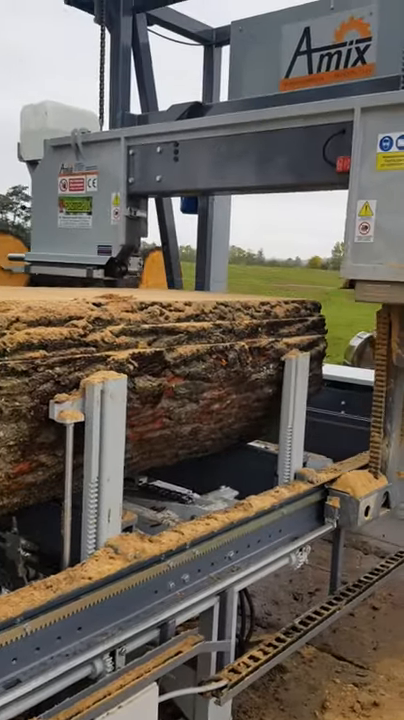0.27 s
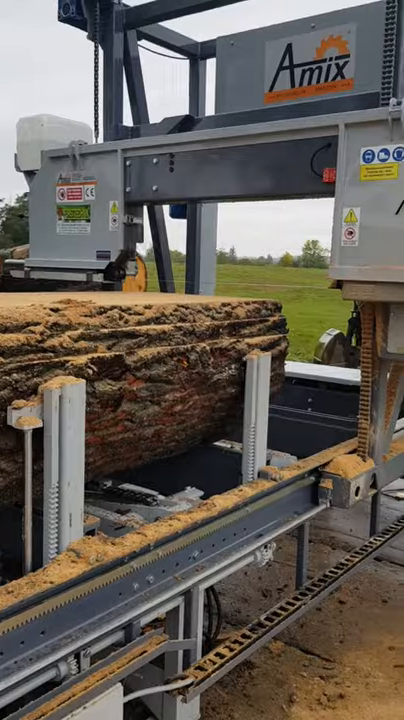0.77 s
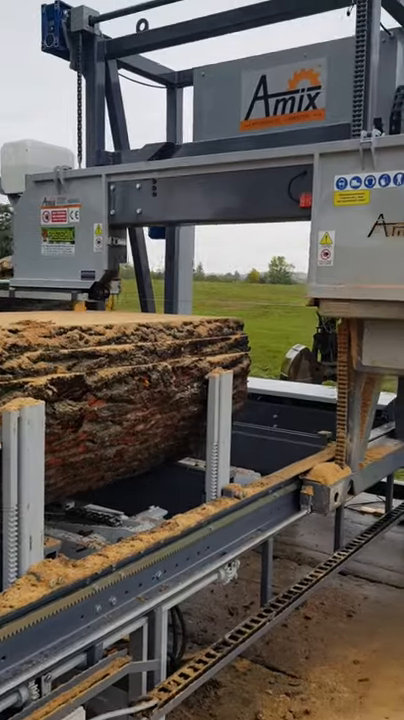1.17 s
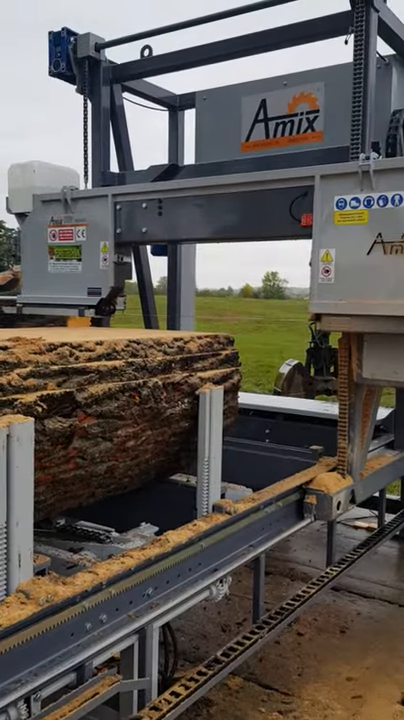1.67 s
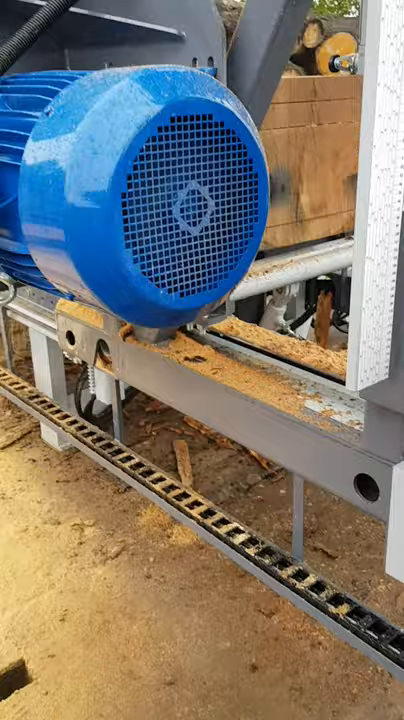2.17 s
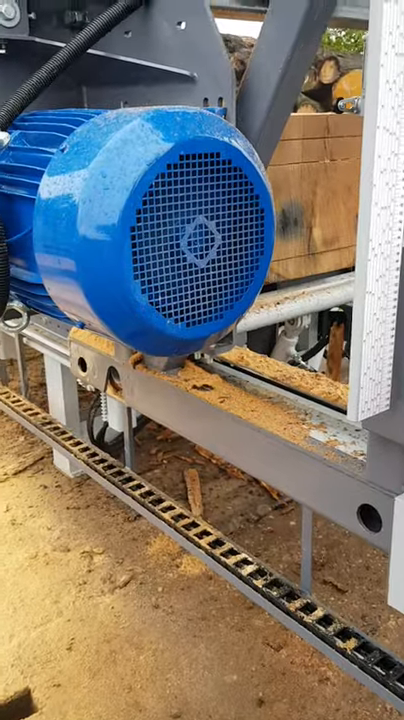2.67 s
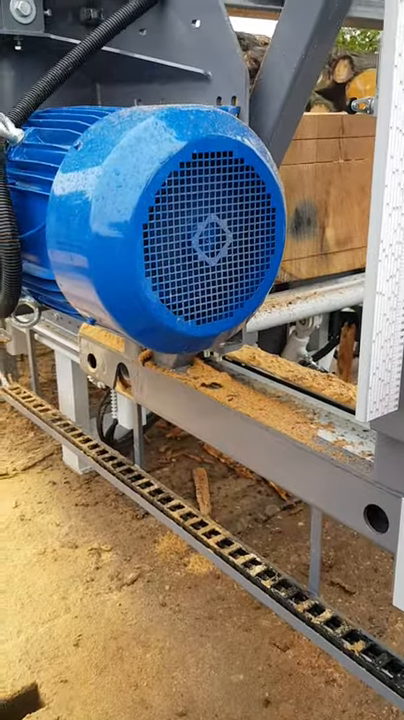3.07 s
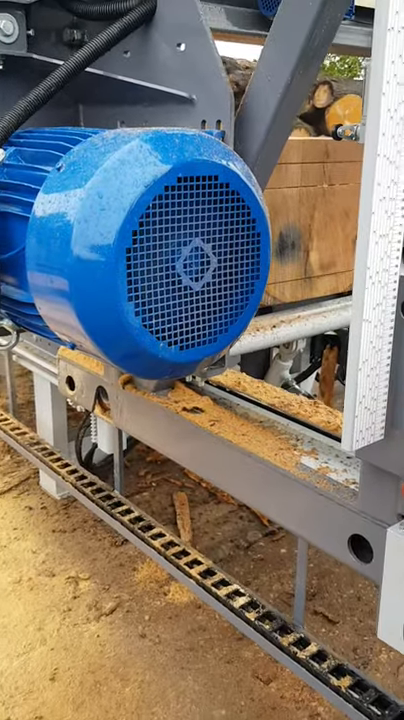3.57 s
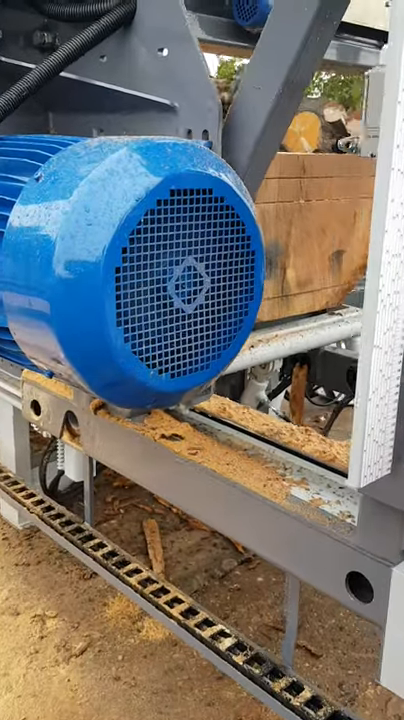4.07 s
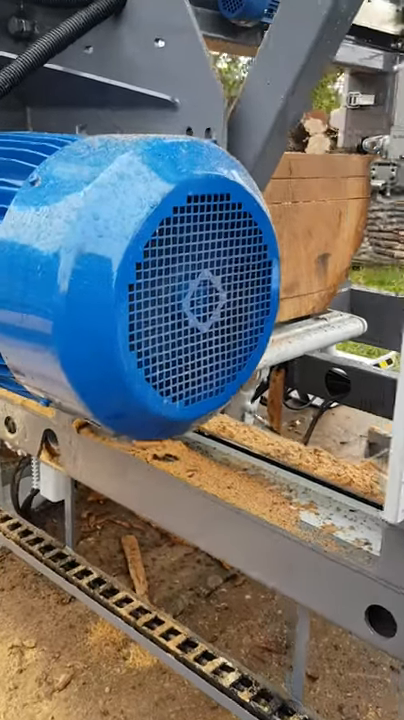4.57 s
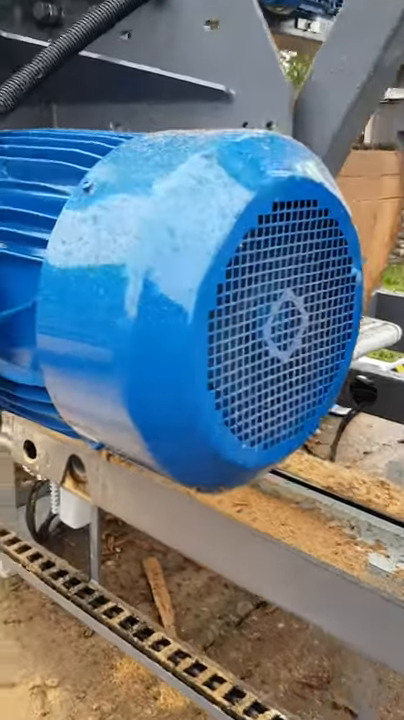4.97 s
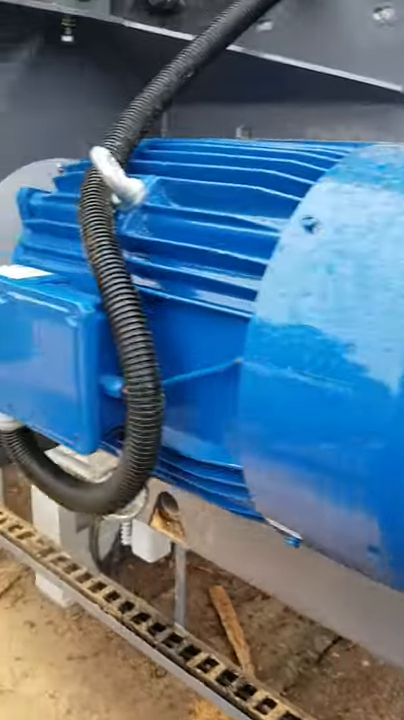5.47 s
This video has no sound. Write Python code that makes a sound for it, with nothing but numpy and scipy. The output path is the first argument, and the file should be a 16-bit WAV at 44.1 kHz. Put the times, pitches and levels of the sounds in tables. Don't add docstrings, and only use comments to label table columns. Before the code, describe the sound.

Outdoors in an open yard, a sawmill carriage rolls with loose steel rattling, hollow clanks, ticks and low wind buffeting on the microphone. The rattle thins and a faint high drive whine appears. At about 2.15 seconds a hard cut brings a much louder, close band saw in a log: steady toothy buzz, dense bright sawdust hiss, rough motor drone and wood crackle, continuing to the end.

```python
import sys
import numpy as np
from scipy import signal
from scipy.fft import rfft, irfft
from scipy.io import wavfile
from scipy.ndimage import uniform_filter1d

SR = 44100
rng = np.random.default_rng(int(sys.argv[2]) if len(sys.argv) > 2 else 0)


def invert_db(level):
    return 10 ** (np.asarray(level, dtype=float) / 20)


def to_wav(s):
    ch = np.atleast_2d(s).T
    pcm = np.round(np.clip(ch, -1, 1) * 32767)
    wavfile.write(sys.argv[1], SR, pcm.astype(np.int16))


N = 252252
T = np.arange(N) / SR
HZ = np.arange(N // 2 + 1) * SR / N + 1e-3
LR = np.array([[0.5], [-0.5]])
IDLE_END_S, SAW_START_S = 2.1485, 2.155
PORT_LAG = 6

# time_s, tooth_rate_hz
BLADE = [(2.29, 417.65), (2.66, 417.05), (3.04, 417.1), (3.41, 417.15), (3.78, 417.3), (4.15, 418.05),
         (4.52, 417.3), (4.89, 417.8), (5.27, 417.9)]
# pitch_hz, width_hz, level_db
PORT = [(48.8, 20, 0)]


def unit(x):
    return x / np.sqrt(np.mean(x ** 2))


def curves(table):
    s, *columns = np.transpose(table)
    return [np.interp(T, s, column) for column in columns]


def over_hz(table, outside=None):
    hz, value = np.transpose(table)
    return np.interp(np.log(HZ), np.log(hz), value, outside, outside)


def colour(table):
    return invert_db(over_hz(table, -99))


def rings(table):
    power = sum(invert_db(2 * db) / (1 + (2 * (HZ - hz) / width) ** 2) ** 2 for hz, width, db in table)
    return np.sqrt(power)


def window(start_s, length_s, edge_s):
    inside = np.minimum(T - start_s, start_s + length_s - T)
    return np.clip(inside / edge_s + 0.5, 0, 1) ** 2


def walk(rate, size=1):
    k = int(SR / rate)
    held = np.repeat(rng.standard_normal((size, N // k + 1)), k, axis=1)
    return 1.348 * uniform_filter1d(uniform_filter1d(held, k), k)[:, :N]


def noise(gain, like=None, grain_db=0.0, flicker_db=0.0, rate=12, even_s=3.6):
    # pitch_hz, likeness (0-1)
    likeness = [(60, 1), (150, 1), (300, 0.92), (500, 0.9), (700, 0.43), (1400, 0.19), (3000, 0.3),
                (16000, 0)]
    like = over_hz(likeness) if like is None else like
    grain = np.minimum(rng.exponential(size=N), 2 * np.pi)
    white = rng.standard_normal((2, N)) * invert_db(grain_db * grain + flicker_db * walk(rate, size=2))
    mid, side = rfft(white) * gain
    out = irfft(np.sqrt(1 + like) * mid + 2 * LR * np.sqrt(1 - like) * side, N)
    k = max(int(even_s * SR), 64)
    power = uniform_filter1d(uniform_filter1d(np.mean(out ** 2, axis=0), k), k)
    return unit(out / np.sqrt(power))


def tone(hz, wobble_hz, rate):
    return np.sqrt(2) * np.sin(2 * np.pi * np.cumsum(hz + wobble_hz * walk(rate)[0]) / SR)


def knocks(blows, crack_db, contact_cycles=0.25):
    out, t = np.zeros((2, N)), T[:4096]
    band = signal.butter(3, (1200, 4300), "band", fs=SR, output="sos")
    crack = signal.sosfilt(band, rng.standard_normal((len(blows), 4096)))
    for (s, db, hz, pan_db, cycles), grit in zip(blows, crack):
        ring = np.sin(2 * np.pi * hz * t) + 0.08 * np.sin(2 * np.pi * 1.58 * hz * t)
        ring = ring * np.exp(-t * hz / cycles)
        grit = 2 * invert_db(crack_db) * grit * np.exp(-t * hz / (0.94 * cycles + 3))
        rise = np.sin(np.pi / 2 * np.minimum(t * hz / contact_cycles, 1)) ** 2
        start = int(s * SR)
        out[:, start:start + 4096] += invert_db(db + LR * pan_db) * rise * (ring + grit)
    return out


def echoed(x):
    late = T - 0.001082 - 0.000141 * walk(1.2, size=2)
    return x + invert_db(-8) * np.array([np.interp(when, T, port) for when, port in zip(late, x)])


def lagged(x, samples):
    return np.array([x[0], np.roll(x[1], samples)])


def saw():
    # time_s, drone_db, left_minus_right_db, pure_tone_share_db
    motor = [(2.2, -27.5, -3, 7.5), (2.35, -27.5, 1, 5.5), (2.9, -24, -1, -4), (3.25, -28, -1.5, 7),
             (3.6, -22.5, 0, -6), (4.0, -28, 1.5, 10.5), (4.25, -22, 1.3, -4.5), (4.6, -21.5, 1, -3.5),
             (4.85, -30, 5, 8), (5.05, -25, 3.5, -3), (5.23, -29, 10, -6), (5.4, -24, 6.5, 0.5),
             (5.6, -23.5, 7, 6.5), (5.72, -17.5, 2, -4)]
    # time_s, hiss_db
    load = [(2.2, -20.5), (2.39, -23.5), (3.25, -23.5), (3.4, -25), (4.58, -23.5), (4.72, -25.5),
            (5.17, -24), (5.72, -26)]
    # time_s, log_db, guard_db
    ringing = [(2.2, 1, -0.5), (2.5, 2, 0.5), (2.9, 1.5, 1), (3.1, -2, 3), (3.3, 0, 3), (3.55, 0, -2.5),
               (3.85, 1.5, 2), (4.1, 0, 0), (4.4, 1.5, -7), (4.7, 0.5, 3.5), (4.9, 0, -9), (5.1, 3.5, 1.5),
               (5.3, 5, 4.5), (5.5, -1.5, 3), (5.72, 3, 2.5)]
    drone_db, pan_db, tone_db = curves(motor)
    near_db, load_db = drone_db + 25, curves(load)[0] + 23
    closing_db = 1.46 * (T - SAW_START_S)
    log_db, guard_db = curves(ringing)
    bite = teeth() * invert_db(-26 + load_db - 0.57 * closing_db - LR * 2.7)
    body = echoed(sawdust(load_db) + bite) + wood(log_db, load_db, closing_db)
    body = body + blade_guard(guard_db, closing_db) + frame_drone(near_db, pan_db)
    body = body + fan(near_db + tone_db, pan_db, closing_db)
    chatter_db = 0.6 * walk(22)
    return body * invert_db(chatter_db + uniform_filter1d(catches(), size=128)) + ground()


def teeth():
    # pitch_hz, level_db
    tooth = [(300, -11), (420, -6), (900, -26), (1250, -7), (1670, -10), (2090, -7), (2500, -14),
             (3600, -13.5), (4200, -12), (5000, -14.5), (5450, -12.5), (5850, -7), (6800, -5.5), (8300, -8),
             (9000, -12), (10400, -7.5), (11300, -15), (13000, -13), (13770, -10), (14400, -12),
             (15000, -12), (15700, -14)]
    turn, out = np.cumsum(curves(BLADE)[0]) / SR, np.zeros((2, N))
    for port in out:
        for drift in walk(3.5, size=5):
            place = turn + rng.random() + 0.036 * drift
            port += np.sin(75 * np.pi * place) / (np.sin(np.pi * place) + 1e-9)
    smear = np.exp(2j * np.pi * (HZ / 417.4) ** 2 / 74)
    return unit(irfft(rfft(out) * colour(tooth) * smear, N))


def whistles():
    # start_s, length_s, multiple of the tooth rate, level_db
    partials = [(2.16, 0.2, 36, -38), (2.16, 0.35, 19, -38), (2.2, 0.6, 4, -36), (2.3, 1.2, 25, -38.5),
                (2.95, 0.4, 4, -39), (3.9, 0.3, 4, -38), (2.3, 0.5, 20, -40), (2.8, 0.5, 32, -41),
                (2.5, 0.35, 33, -40), (2.6, 0.6, 17, -39), (2.9, 0.45, 20, -37), (3.1, 0.4, 31, -40),
                (3.15, 0.25, 15, -39), (3.55, 0.45, 25, -36), (3.75, 0.25, 18, -39), (3.95, 0.3, 17, -39),
                (4.2, 0.75, 16, -36), (4.3, 0.3, 33, -39), (4.35, 0.2, 27, -39), (4.4, 0.4, 25, -40),
                (4.55, 0.25, 18, -39), (4.75, 0.25, 15, -39), (5.1, 0.3, 18, -39), (5.55, 0.25, 15, -39)]
    turn = 2 * np.pi * np.cumsum(curves(BLADE)[0]) / SR
    flutter, lag = walk(14, size=2), walk(9, size=2)
    out = np.zeros((2, N))
    for s, length, k, db in partials:
        sine = np.sqrt(2) * np.sin(k * turn + np.roll(lag, int(97 * k), axis=1))
        level_db = db - 1 + 2.5 * np.roll(flutter, int(3001 * k), axis=1)
        out += sine * window(s, length, 0.13) * invert_db(level_db)
    return out


def sawdust(load_db):
    # pitch_hz, level_db (per Hz)
    hiss = [(2500, -60), (3200, -16), (3900, -6.5), (4200, -3.5), (5300, -4.5), (5900, 0), (6900, 2.5),
            (8000, 0), (8800, -3.5), (10400, 2), (11800, -0.5), (13300, 1), (14300, -1.5), (15300, -2.5),
            (16500, 2)]
    dust = noise(colour(hiss), grain_db=2.0, flicker_db=0.5, rate=14, even_s=0.051)
    dust = dust * invert_db(-23 + load_db - LR * 2.8)
    spray = signal.sosfiltfilt(signal.butter(2, 9000, "high", fs=SR, output="sos"), dust)
    return dust + (0.05 * (T - SAW_START_S) - 0.06) * spray


def wood(log_db, load_db, closing_db):
    # pitch_hz, width_hz, level_db
    log_notes = [(695.5, 95, 1.5), (587, 145, -3.5), (1353, 41, -1.5)]
    # pitch_hz, level_db (per Hz)
    fibres = [(250, -6), (430, -11), (699, -4.5), (874, -6.5), (1010, -10), (1170, -7), (1700, -5),
              (3170, -13), (4000, -21), (5200, -45), (8800, -120)]
    log = noise(rings(log_notes), flicker_db=2.0, rate=14, even_s=0.22)
    log = log * invert_db(-32.5 + log_db + 0.93 * closing_db + 0.37 * load_db + LR * 2.3)
    torn = noise(colour(fibres), grain_db=0.54, flicker_db=2.5, rate=23, even_s=0.14)
    return log + torn * invert_db(-27 + closing_db + 0.38 * load_db - LR * 3.7)


def blade_guard(guard_db, closing_db):
    # pitch_hz, width_hz, level_db
    guard_notes = [(1004, 47, 1), (990, 130, -5), (1074, 74, -1)]
    buzz = noise(rings(guard_notes), like=0.32, flicker_db=0.5, rate=12, even_s=0.48)
    buzz = buzz * invert_db(-30 + 0.22 * guard_db + 0.36 * closing_db - LR * 4.8)
    note_db = -40 + 2.4 * guard_db + 0.42 * closing_db + 1.9 * walk(18) - LR * 3
    return buzz + tone(983, 11.1, 25) * invert_db(note_db)


def frame_drone(near_db, pan_db):
    # pitch_hz, width_hz, level_db
    frame_notes = [(331.5, 73, 6), (306, 46, -1), (357, 24, 4), (248, 59, -22)]
    return noise(rings(frame_notes), even_s=0.026) * invert_db(-28 + near_db + LR * pan_db)


def fan(near_db, pan_db, closing_db):
    low = tone(167.4, 4.54, 14) * invert_db(-38 + 0.59 * closing_db + 1.3 * walk(9))
    hum = tone(326.1 + 1.702 * (T - SAW_START_S), 3.024, 20)
    return low + hum * invert_db(-31 + near_db + 1.4 * walk(18) + LR * pan_db)


def catches():
    # time_s, falter_db, surge_db
    knots = [(2.36, 0.5, 0), (2.621, 1, 3), (2.94, -1.5, 1.5), (3.577, -2, 1.5), (3.65, 2, 3.5),
             (3.711, 0, 0), (3.836, 1.5, 0), (4.151, -4, 2.5), (4.274, -5, 3), (4.332, 1, 0.5),
             (4.599, 1, 0.5), (4.653, -2, 2), (4.923, 0.5, 1.5), (5.091, -1, 2), (5.51, -2, 1.5),
             (5.565, -2, 2), (5.667, 2, 5), (5.698, -5, 0)]
    level_db = np.zeros(N)
    for s, falter_db, surge_db in knots:
        falter = falter_db * np.exp(np.minimum(T - s, 0) / 0.014)
        surge = surge_db * np.exp(np.minimum(s - T, 0) / 0.021)
        level_db += np.where(T < s, falter, surge)
    return level_db


def ground():
    # pitch_hz, level_db (per Hz)
    ground_colour = [(41, -47.5), (70, -12.5), (108, -8.5), (161, -5), (183, -3.5), (210, -7), (260, -2.5),
                     (340, -38), (570, -120)]
    return noise(colour(ground_colour), even_s=0.25) * invert_db(-36) + noise(rings(PORT), even_s=0.094) * invert_db(-39)


def carriage():
    # time_s, level_db
    roll = [(0.0, -2.5), (0.2, 0.6), (0.5, 0.5), (0.7, 6.5), (1.0, 2.5), (1.25, -3), (1.6, -3), (1.7, -12),
            (2.15, -15)]
    # pitch_hz, width_hz, level_db
    rail = [(690, 106, -4), (626, 250, 3.5), (800, 94, 0)]
    # pitch_hz, width_hz, level_db
    low_notes = [(314, 23, 10.5), (409, 87, 1.5), (247, 48, 3)]
    # pitch_hz, level_db (per Hz)
    loose = [(530, -32.5), (900, -1), (992, -9), (1150, 0), (1340, -7.5), (1810, -6), (2780, -12),
             (3820, -17.5), (4600, -33), (5550, -22), (7500, -39), (9750, -63), (16500, -120)]
    # time_s, rumble_surge_db, rattle_surge_db
    jolts = [(0.2, 8, 1), (0.405, 4, 7.5), (0.6, -7, 7.5), (0.83, 4, 0.5), (0.931, 11, 6.5),
             (1.01, 10.5, 3.5), (1.1, 10.5, -0.5), (1.13, 1, 6.5), (1.18, 9, 2.5), (1.36, 13, 4),
             (1.5, 10, 5), (1.26, 5, 5), (1.6, 8, 2), (1.725, 17, 11), (1.9, 1.5, 8), (2.0, 7, 6),
             (2.13, 9, 9)]
    db = curves(roll)[0]
    low_surge_db, high_surge_db = np.zeros((2, N))
    for s, low_db, high_db in jolts:
        jolt = np.exp(np.minimum((T - s) / 0.015, (s - T) / 0.046))
        low_surge_db += low_db * jolt
        high_surge_db += high_db * jolt
    ring = noise(rings(rail), like=0.6, grain_db=1.5, flicker_db=1.0, rate=46, even_s=0.17)
    ring = ring * invert_db(-43.5 - 6 * T + db + 1.27 * high_surge_db)
    rumble = noise(rings(low_notes), even_s=0.088) * invert_db(-50.5 + 3 * T + 1.3 * db + low_surge_db)
    rattle = noise(colour(loose), like=0.38, grain_db=2.5, flicker_db=3.5, rate=44, even_s=0.03)
    return ring + rumble + rattle * invert_db(-47.5 - 5 * T + 0.44 * db + high_surge_db)


def steel():
    # time_s, peak_db, ring_cycles
    bed_blows = [(0.094, -35, 9.8), (0.147, -31, 10.5), (0.18, -32, 12), (0.2, -37, 8.6),
                 (0.215, -28.5, 18), (0.267, -33, 12), (0.29, -44, 10.4), (0.313, -31, 8.4),
                 (0.343, -34, 8), (0.365, -32, 6.4), (0.402, -27, 11), (0.53, -31, 6.7), (0.563, -32, 16),
                 (0.584, -28, 8.7), (0.605, -29, 13), (0.633, -29, 6.5), (0.693, -34, 22), (0.797, -36, 14),
                 (0.826, -30, 13), (1.077, -43.5, 9.9), (0.915, -46, 14), (0.95, -34, 11), (1.222, -39, 15)]
    # time_s, peak_db, pitch_hz
    clanks = [(0.404, -33, 1110), (0.41, -27.5, 858), (0.6, -38, 1200), (0.98, -38, 1180),
              (1.019, -32, 820), (1.128, -39, 1130), (1.512, -38, 786), (1.01, -38, 1200),
              (1.24, -43, 1230), (1.31, -44, 1220), (1.36, -45, 1210), (1.41, -45, 1220)]
    # time_s, peak_db, pitch_hz, left_minus_right_db
    ticks = [
        (0.43, -37.5, 1010, 0.6),
        (0.9068, -25, 1950, 3.26),
        (1.438, -37, 800, 7.5),
        (1.463, -33, 1180, -0.6),
        (1.5794, -40, 2400, 1.7),
        (1.7245, -23, 1000, -2.65),
        (1.789, -45.5, 800, 4),
        (1.877, -32, 700, 11),
    ]
    bed = knocks([(s, db, 716 - 63 * s, 0, cycles) for s, db, cycles in bed_blows], crack_db=-23)
    clank = knocks([(*row, 0, 8.5) for row in clanks], crack_db=-31)
    return bed + clank + knocks([(*row, 0.9) for row in ticks], crack_db=-34, contact_cycles=0.41)


def chain():
    # pitch_hz, width_hz, level_db
    scrape_notes = [(2100, 700, 2), (2900, 800, -5), (3880, 900, -4)]
    # start_s, length_s, level_db
    drags = [
        (0.2, 0.04, -60),
        (0.59, 0.055, -49.5),
        (0.69, 0.05, -55),
        (0.79, 0.08, -51.5),
        (0.89, 0.05, -55),
        (1.12, 0.05, -53),
        (1.35, 0.033, -65),
    ]
    grit = noise(rings(scrape_notes), like=0.3, grain_db=3.0, flicker_db=2.5, rate=60, even_s=0.05)
    return grit * sum(window(s, length, 0.02) * invert_db(db) for s, length, db in drags)


def drive():
    companions = [(.481, -7), (.935, -9), (1.492, -12)]
    whine_hz, on_s, rise_s, off_s, fall_s = 6001, 1.25, 0.2, 1.93, 0.09
    whine = tone(whine_hz, 13.2, 50)
    whine = whine + sum(tone(k * whine_hz, 30.0, 40) * invert_db(db) for k, db in companions)
    shape = np.clip((T - on_s) / rise_s, 0, 1) * np.clip(1 - (T - off_s) / fall_s, 0, 1)
    return whine * shape * invert_db(-66 - 5 * (T - on_s - rise_s) + 1.3 * walk(29.3)[0])


def wind():
    # time_s, level_db
    strength = [(0.0, 0.5), (0.15, -1.5), (0.42, 0), (1.5, -1), (1.62, -2), (1.82, -4.5), (1.89, 0),
                (1.93, -4), (1.99, -1.5), (2.03, -2), (2.075, -5), (2.09, -22), (2.108, -15), (2.125, 0.5)]
    # pitch_hz, level_db (per Hz)
    gust = [(44, -31), (75, -0.5), (183, 2), (221, -7), (253, -5), (281, -9), (308, -15), (330, -7.5),
            (430, -34), (730, -120)]
    # start_s, length_s, boom_db, buffet_db
    left_spans = [(-0.05, 0.115, -4, 0), (0.095, 0.037, -10.5, 6), (0.182, 0.17, -11, 3.5),
                  (0.378, 0.61, 0.5, 0), (1.104, 0.086, 4, 1), (1.352, 0.033, -25, -11), (1.49, 0.068, 3, -3),
                  (1.735, 0.039, -25, 6), (1.877, 0.037, -15, -19.5), (1.991, 0.048, 1, 7),
                  (2.111, 0.06, 2, 0)]
    # time_s, peak_db, pitch_hz, left_minus_right_db, ring_cycles
    thumps = [
        (1.9495, -19, 95, -27, 1.1),
    ]
    db = curves(strength)[0]
    left_boom, left_buffet = np.full((2, N), invert_db(-36))
    for s, length, boom_db, buffet_db in left_spans:
        span_gain = window(s, length, 0.022)
        left_boom += span_gain * invert_db(boom_db)
        left_buffet += span_gain * invert_db(buffet_db)
    boom = noise(rings(PORT), like=0.77, even_s=0.06) + invert_db(8) * tone(49, 3.5, 15)
    boom = boom * invert_db(-40 + db) * [left_boom, np.ones(N)]
    buffet = noise(colour(gust), like=0.97, even_s=0.084) * invert_db(-37 + 1.45 * db)
    return knocks(thumps, crack_db=-60) * invert_db(-13.5) + boom + buffet * [left_buffet, np.ones(N)]


def yard():
    # pitch_hz, level_db (per Hz)
    yard_colour = [(400, 4.5), (600, -4.5), (880, -6.5), (1400, -14), (2900, -19.5), (6100, -19),
                   (7200, -22.5), (8500, -27.5), (12000, -23.5), (16500, -32)]
    # start_s, length_s, level_db (over the yard)
    snaps = [
        (0.41, 0.036, 3),
        (0.442, 0.008, 5),
        (0.6, 0.04, 1),
        (0.723, 0.008, 5),
        (0.775, 0.01, 4),
        (0.907, 0.005, 11),
        (1.58, 0.006, 6),
        (1.724, 0.004, 6),
        (1.787, 0.005, 5),
    ]
    snap_db = sum(db * window(s, length, 0.003) for s, length, db in snaps)
    return noise(colour(yard_colour), even_s=0.086) * invert_db(-51.5 + snap_db)


def scene():
    idle = lagged(carriage() + chain() + yard(), -PORT_LAG) + steel() + drive() + wind()
    cutting = lagged(saw() + whistles(), PORT_LAG)
    idle_on = np.clip((IDLE_END_S - T) / 0.00031, 0, 1)
    saw_on = np.clip((T - SAW_START_S) / 0.009, 0, 1)
    return idle * idle_on + cutting * saw_on


def top_cut(x):
    return signal.sosfilt(signal.butter(12, 15740, fs=SR, output="sos"), x)


def record(dry):
    heard = signal.sosfilt(signal.butter(3, 40, "high", fs=SR, output="sos"), dry)
    mix = irfft(rfft(heard) * (HZ < 15735), N)
    return top_cut(mix)


dry = scene()
out = record(dry)
to_wav(out)
```